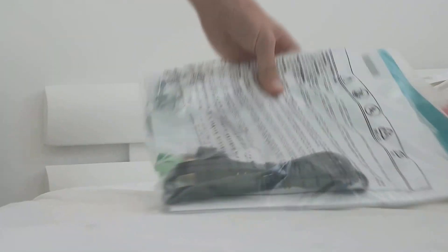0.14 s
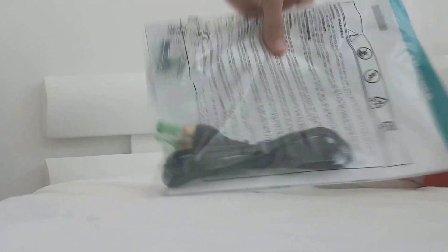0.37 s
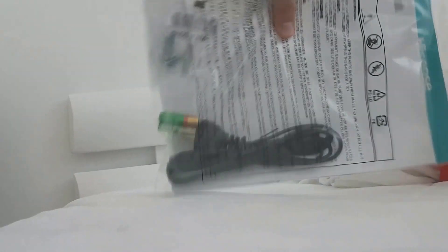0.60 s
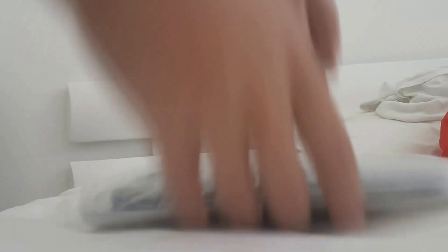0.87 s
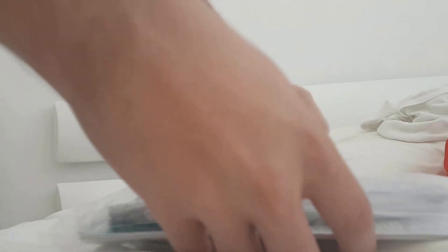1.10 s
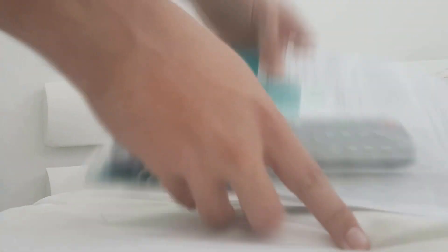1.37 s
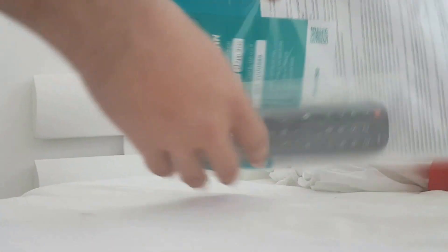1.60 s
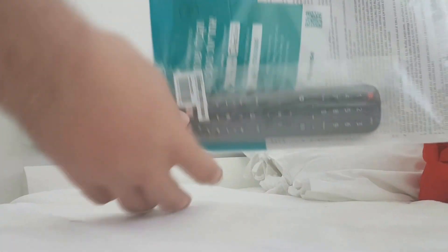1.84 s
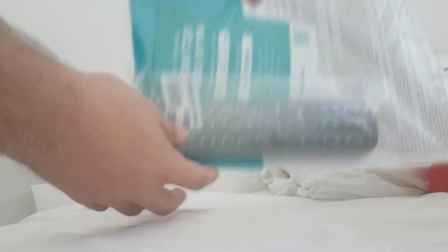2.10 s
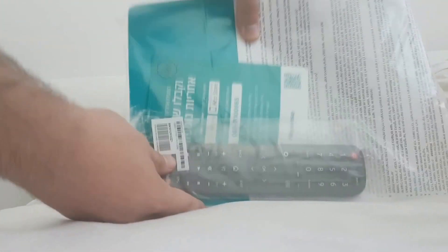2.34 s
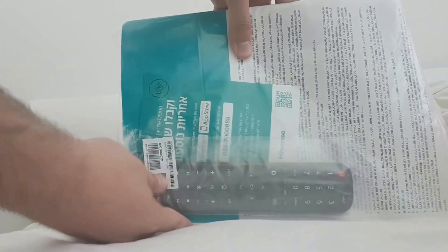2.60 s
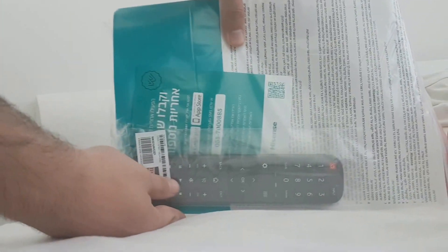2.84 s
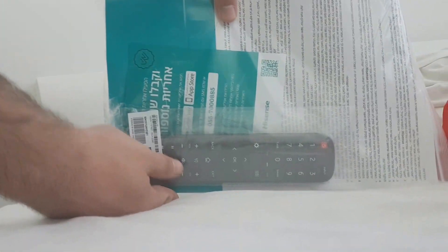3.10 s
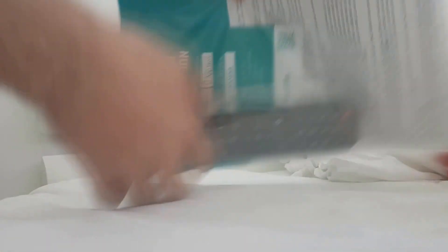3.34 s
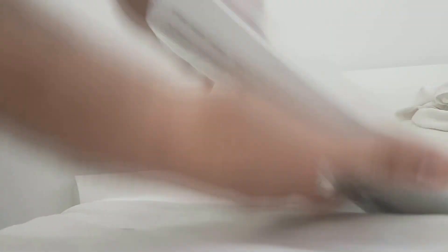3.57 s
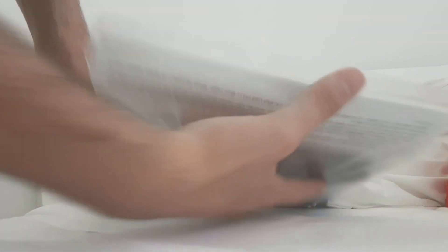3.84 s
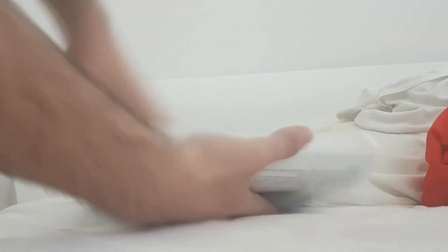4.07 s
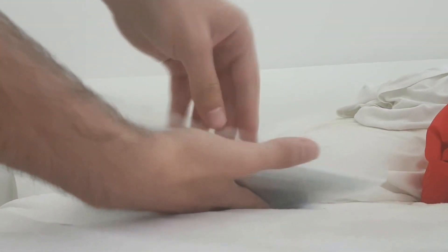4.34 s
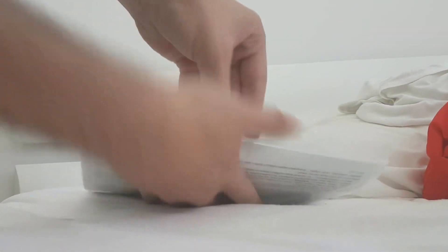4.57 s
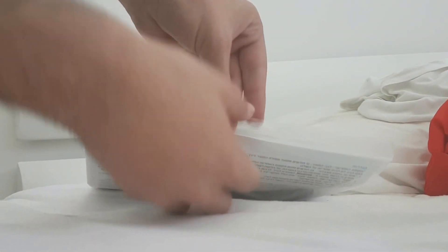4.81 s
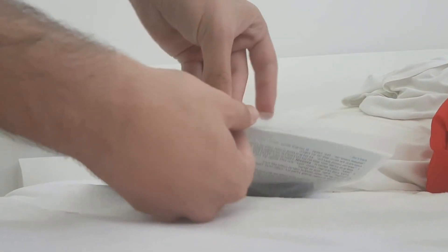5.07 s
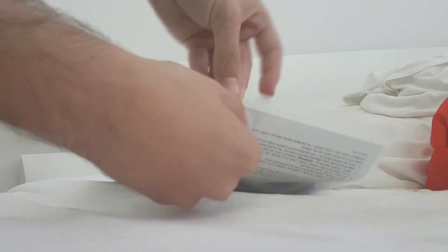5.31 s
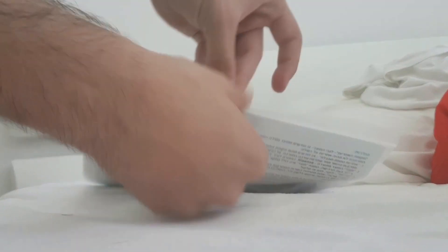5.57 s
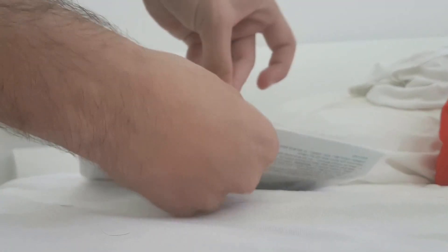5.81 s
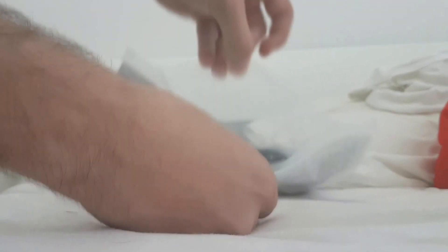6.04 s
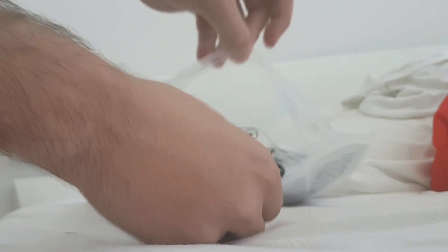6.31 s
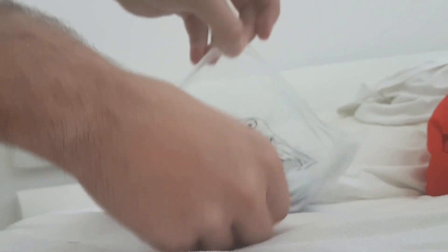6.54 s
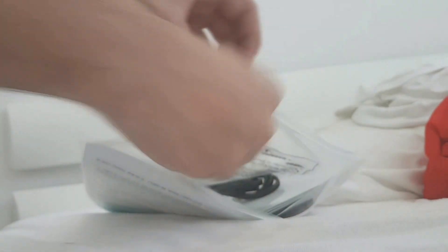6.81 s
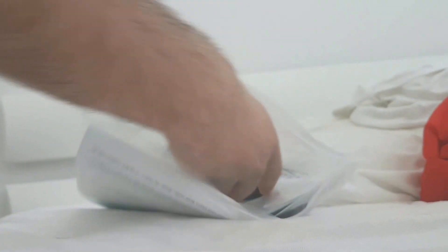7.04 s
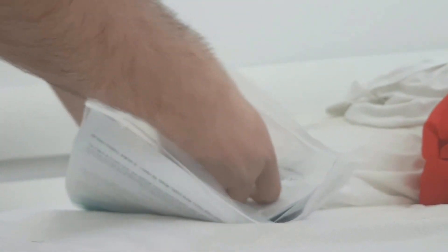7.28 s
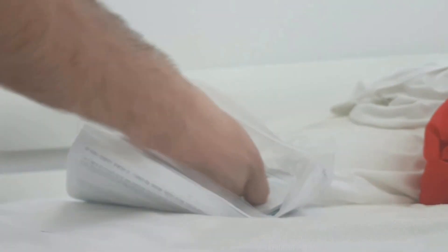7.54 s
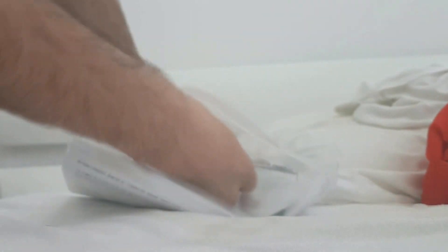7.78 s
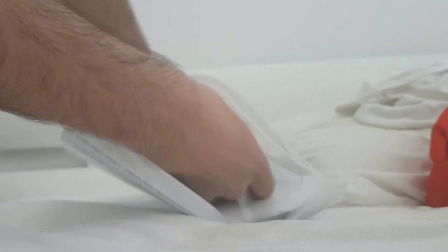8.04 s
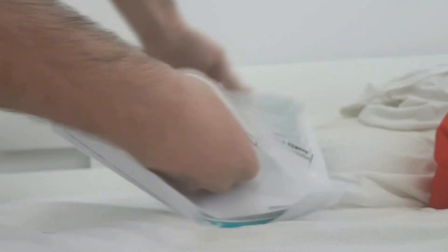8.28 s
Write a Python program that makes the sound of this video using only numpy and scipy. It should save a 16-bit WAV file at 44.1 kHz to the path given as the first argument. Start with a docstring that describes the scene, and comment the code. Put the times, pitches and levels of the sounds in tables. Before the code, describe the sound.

Hands crinkle and turn a thin plastic bag of paper leaflets on a bed, with sharp creasing snaps and soft mattress thumps in a quiet room.

```python
"""Two hands lift, turn and tear open a thin plastic bag of leaflets, a cord and a remote on a bed, near a two-port mic.
It opens on rustling and ringing creases, and from one second heavy parts thump the mattress as low swings.
Just past two seconds comes the loudest snap, a clear, brief ring with hardly any crunch; near 2.6 s a soft sine slides down.
Thumps, bright cracks and a deep wind puff at 3.8 s follow; ticks are sparse from 4.4 s, and after 5.9 s snaps crowd to the end.
Decaying rings make the creases, shaped noise the film, bed and constant hush; a small soft room answers the bag."""
import sys
import numpy as np
from scipy import signal
from scipy.fft import rfft, irfft, next_fast_len
from scipy.io import wavfile
from scipy.ndimage import map_coordinates

SR = 44100
rng = np.random.default_rng(int(sys.argv[2]) if len(sys.argv) > 2 else 0)


def dump(signal):
    """Clip the signal to [-1, 1] and save it as 16-bit WAV at the path in sys.argv[1]."""
    limited = np.clip(np.atleast_2d(signal).T, -1, 1)
    pcm = np.round(limited * 32767).astype(np.int16)
    wavfile.write(sys.argv[1], SR, pcm)


def linear_from_db(decibels):
    """Turn decibels (scalar or array-like) into linear amplitude factors; 0 gives 1."""
    return 10 ** (np.asarray(decibels, float) / 20)


N = 370440

# Large creases flipping over. Each row: start in seconds, before SNAP_DELAY_S, base level in dB, ring pitch in Hz,
# crack relative to the base in dB, ring relative to the base in dB.
CREASE_SNAPS = [(0.062, -30.5, 1810, -30, -7.5), (0.146, -31.5, 1350, -10.5, -6),
                (0.185, -26, 1820, -18, -5), (0.271, -38, 3550, -7.5, 2), (0.341, -42, 1410, -21, -9),
                (0.376, -28.5, 1920, -22, -6.5), (0.447, -25, 2510, -32, -5.5),
                (0.479, -29.5, 890, -14.5, -7.5), (0.646, -38, 2030, -15.5, -5.5),
                (0.683, -33.5, 1370, -17, -6), (0.728, -24.5, 1580, -11, -5), (0.776, -22, 2080, -13, -8),
                (0.888, -23.5, 1680, -12.5, -2), (0.923, -29, 1440, -9, -9.5), (0.973, -34, 1770, -33, -5),
                (1.036, -30.5, 2210, -27.5, -3), (1.081, -32.5, 1780, -23, -6), (1.17, -32, 1890, -19, -4),
                (1.18, -29, 1550, -14, -13), (1.196, -25, 2050, -16.5, -5), (1.288, -34, 1870, -7.5, -5),
                (1.323, -31.5, 1120, -6.5, -11), (1.484, -25, 2560, -13, -5), (1.566, -37, 1400, -28, -6),
                (1.584, -39, 1100, -25, -5), (1.602, -27.5, 1690, -44, -5), (1.63, -33, 1510, -27, -8.5),
                (1.777, -41, 874, -25, -6.5), (1.969, -34.5, 837, -33, -3.5), (1.996, -38.5, 1270, -25, -8),
                (2.163, -12, 2610, -37, 1.5), (2.214, -32.5, 1070, -23, 0.5), (2.291, -33, 1740, -19, -5),
                (2.348, -29.5, 1870, -22, -4), (2.458, -45, 1250, -25, -1), (2.729, -35, 2700, -33, -2),
                (2.834, -37.5, 1880, -22, -4.5), (2.945, -37, 2380, -48, -1.5), (3.221, -42, 686, -1, -2),
                (3.232, -29.5, 1290, -15, -16), (3.352, -23.5, 5500, -17, 0.5), (3.395, -40, 1480, -1, -6),
                (3.435, -34.5, 1560, -5, -2), (3.497, -30.5, 2510, -16, -3.5),
                (3.682, -24, 1850, -16, -5.5), (3.874, -30, 780, -37, -7), (4.032, -33.5, 1750, -27, -7),
                (4.166, -30, 1580, -9, -6.5), (4.344, -34.5, 2120, -9, 3.5), (4.532, -41.5, 780, -31, -7),
                (4.709, -43.5, 786, -27, -5), (4.794, -43.5, 830, -20, -7), (4.827, -24, 1060, -16, -5),
                (5.151, -49, 2250, -16, -5), (5.265, -40, 1240, -19, -4), (5.289, -37, 7600, -9, 1),
                (5.321, -36, 940, -22, -2), (5.335, -23.5, 5250, -8.5, -2), (5.54, -51, 2010, -6, -9),
                (5.628, -40, 1230, -20, -5.5), (5.677, -43.5, 1240, -6.5, -7), (5.78, -51, 1830, -7, -8.5),
                (5.82, -47.5, 1500, -16, -7), (5.943, -39, 1260, -5, -6), (5.951, -32, 1010, 3, -6.5),
                (5.976, -35, 1230, -16, -7), (6.018, -29, 1300, -6.5, -14), (6.159, -40, 900, -17, -8.5),
                (6.177, -32, 740, -7, -5.5), (6.215, -32.5, 890, -18, -7),
                (6.362, -23.5, 3050, -12.5, -3.5), (6.443, -41, 830, -3, -7),
                (6.538, -41.5, 2170, -7.5, -9), (6.638, -36, 870, -10, -7), (6.661, -36, 910, -19, -8),
                (6.768, -35.5, 1530, -15, -8), (6.865, -34.5, 1360, -13.5, -5.5),
                (6.924, -30.5, 1140, -3.5, -7), (6.992, -23.5, 1940, -32, -7),
                (7.196, -29, 2110, -10, -2.5), (7.321, -39.5, 2570, -22, -5),
                (7.384, -36.5, 1130, -12, -15), (7.427, -36.5, 1100, -28, 1), (7.464, -23, 1180, -28, -7),
                (7.477, -24.5, 1160, -18, -1), (7.566, -28, 1190, -33, -4), (7.625, -22.5, 1310, -24, -5),
                (7.731, -22.5, 1120, -28, -4), (7.785, -30.5, 1120, -14, -5.5), (7.913, -39, 920, -23, -7),
                (7.981, -23, 1150, -38, -3.5), (7.999, -25, 1180, -22, -7.5), (8.167, -30, 1680, -17.5, -3),
                (8.206, -21.5, 1680, -32, -5.5), (8.217, -25, 1220, -21, -0.5), (8.324, -28, 2540, -8, -4)]
# Low thumps of weights on the mattress, and at 3.804 s a deep wind puff on the right port.
# Each row: start in seconds, level in dB, pitch in Hz, left over right in dB.
LOW_THUMPS = [(1.049, -41.5, 105, 6), (1.094, -42, 135, -12), (1.477, -38.5, 320, 1.5),
              (2.497, -53, 290, 7), (2.959, -50, 104, 3), (3.23, -37.5, 282, -0.5), (3.561, -35, 134, -6),
              (3.686, -35, 161, 4), (3.804, -39, 57.6, -24), (3.876, -28.5, 200, 2), (4.001, -33.5, 168, 1),
              (4.823, -41, 231, 2.5), (5.334, -40.5, 175, 4), (5.953, -46.5, 152, 1.5),
              (6.926, -39.5, 308, -2), (7.464, -39, 210, 3), (7.558, -33, 338, 3), (7.726, -32.5, 302, 5),
              (7.787, -35.5, 335, 3), (7.983, -35.5, 222, 1)]
# Noise colour of creased paper. Each row: frequency in Hz, relative density in dB.
PAPER_COLOUR = [(120, -32), (200, -27), (262, -7.5), (334, -20), (413, 0), (741, -8.5), (1390, 2),
                (6000, -14.5), (7800, -46), (13200, -120)]
# Noise colour of thin film. Each row: frequency in Hz, relative density in dB.
FILM_COLOUR = [(1500, -12.5), (2500, -3.5), (4300, -7.5), (6000, -8.5), (7600, -5.5), (8900, -18),
               (11500, -15.5), (15600, -17), (16000, -62), (16700, -60), (17000, -90)]
# Noise colour of the pushed mattress. Each row: frequency in Hz, relative density in dB.
MATTRESS_COLOUR = [(15, -49), (28, -42), (54, -1), (97, -1.5), (205, -1), (330, -5), (500, -20), (800, -54)]
# Noise colour of the room and preamp. Each row: frequency in Hz, relative density in dB.
HUSH_COLOUR = [(12, -13), (22, 11.5), (35, -17), (60, -6.5), (110, -23.5), (262, -4.5), (1480, -20),
               (2200, -20.5), (4940, -26.5), (7400, -22.5), (9400, -30), (15600, -22.5), (16000, -47),
               (17000, -100)]
# Likeness of the noise at the two ports. Each row: frequency in Hz, left-right correlation from 0 to 1.
PORT_LIKENESS = [(30, 0.078), (70, 0.48), (140, 0.99), (300, 0.86), (1000, 0.52), (2500, 0.32),
                 (5000, 0.029), (15000, .02)]
# Uneven balance of the two ports. Each row: frequency in Hz, left over right in dB.
PORT_BALANCE = [(25, -1), (60, 2.5), (130, -1)]
# Decay of the room's tail. Each row: frequency in Hz, time to fall by 60 dB in seconds.
ROOM_DECAY = [(200, 0.29), (1000, 0.25), (3000, 0.34), (8000, 0.25), (15000, 0.091)]
# First echoes. Each row: delay in seconds, level relative to the bag in dB.
FIRST_ECHOES = [(.003, -43.5), (0.0095, -18.5), (0.013, -31), (0.0202, -16.5)]
# Falling tone of a slackening panel. Each row: time in seconds, pitch in Hz, level in dB.
SLACKENING_PANEL = [(2.555, 325, -70), (2.57, 310, -59), (2.615, 211, -55), (2.65, 160, -73)]
# Grips, tugs and squeezes. Each row: peak time in seconds, relative creasing level in dB,
# rise in seconds and fall in seconds (each the time for SWING_DB of paper level), film relative to creasing in dB.
HAND_GRIPS = [(.08, -55.5, 0.033, 0.37, -11), (.188, -52, .4, 0.27, -3.5), (.46, -48, 0.6, 0.18, -7.5),
              (0.734, -38.5, 0.078, 0.051, -8.5), (.786, -35, 0.051, 0.063, -7.5),
              (.844, -33.5, 0.07, 0.21, -7), (1.186, -41.5, .15, 0.45, -17),
              (1.422, -40.5, .45, 0.39, -8.5), (1.66, -54, 0.8, 0.3, -6.5), (2.012, -51.5, 0.095, 0.39, -9),
              (2.171, -49.5, 0.016, 1, -6), (2.546, -62, 0.56, 0.092, -1), (2.832, -62, 0.11, 0.11, -5),
              (2.99, -55, 0.1, 0.069, -11), (3.247, -44, 0.038, 0.12, -7.5), (3.362, -53, .03, 0.37, -12),
              (3.56, -41, 0.082, 0.26, -5), (3.697, -42, 0.13, 0.37, -6.5), (4.047, -44.5, 0.82, .4, -9.5),
              (4.201, -50.5, 0.1, 0.088, 2), (4.355, -55.5, 0.07, 0.24, -4),
              (4.544, -58.5, 0.087, .2, -9.5), (4.699, -57.5, .15, 0.52, -12),
              (4.837, -60, 0.049, .075, -2.5), (5.172, -59.5, 0.41, 0.13, -9), (5.272, -54, .015, .2, -9),
              (5.341, -45.5, 0.098, .1, -6.5), (5.555, -60, 0.071, 0.11, -8),
              (5.671, -51.5, 0.084, .093, -9.5), (5.956, -39.5, .008, 0.26, -5),
              (6.03, -51.5, 0.14, 0.087, -7), (6.212, -48.5, 0.15, 0.25, -12),
              (6.376, -53.5, 0.032, 0.48, -9), (6.655, -48, 0.099, 0.18, -13),
              (6.783, -75, 0.057, 0.13, -6), (6.924, -44, 0.095, 0.26, -5.5),
              (7.052, -41, 0.242, 0.29, -7.5), (7.476, -40, 0.11, 0.23, -12),
              (7.634, -50.5, 0.053, .27, -10), (7.732, -44, 0.035, 0.32, -11),
              (7.995, -41, 0.16, 0.16, -10), (8.215, -44.5, 0.27, 0.64, -10)]
# The bag on the bed. Each row: time in seconds, relative weight on the mattress in dB, left over right in dB.
BAG_ON_BED = [(0, -53.5, 2), (.6, -69.5, 0.5), (1.06, -49.5, 3), (1.4, -57.5, 2.5), (1.9, -75, 1),
              (2.5, -54.5, 3.5), (3.1, -52.5, 1.5), (3.3, -53, 2.5), (3.8, -47, 2.5), (4.4, -63, 3),
              (4.9, -64, 3.5), (5.9, -81, 2), (6.3, -58, 1.5), (6.9, -50.5, 4), (7.4, -50, 2.5),
              (8.4, -52.5, 3.5)]

SWING_DB, FILM_STEEPER = 20, 1.53  # the film's dB slopes are this many times the paper's
BED_FOLLOWS, FIRM_DB = 0.47, -49.5  # share of the hands' dB swings the bed feels, around a firm grip in dB
SNAP_DELAY_S = 0.001247  # short delay added to every snap start, seconds


def unit(x):
    """Scales to rms 1."""
    return x / np.sqrt(np.mean(x ** 2) + 1e-20)


def along(points, hz):
    """Reads a curve of frequency and value on a log frequency axis."""
    f, v = np.transpose(points)
    return np.interp(np.log(hz + 1), np.log(f + 1), v)


def curves(rows):
    """Draws one value per sample for each column after the time."""
    s, *columns = np.transpose(rows)
    return [np.interp(np.arange(N) / SR, s, column) for column in columns]


def wobble(rate):
    """Draws a smooth random curve with rate knots a second."""
    knots = rng.standard_normal(int(N * rate / SR) + 4)
    return map_coordinates(knots, [np.arange(N) * rate / SR])


def filtered(x, response):
    """Shapes x by a gain that depends on frequency."""
    m = next_fast_len(N + 8192)
    return irfft(rfft(x, m) * response(np.fft.rfftfreq(m, 1 / SR)), m)[..., :N]


def sides(lean_db):
    """Splits a left-over-right lean into two gains."""
    return linear_from_db(np.multiply.outer([.5, -.5], lean_db))


def rush(colour):
    """Stereo noise of overall rms 1: shared mid and opposed side set the likeness of the ports at each frequency."""
    def mid_side_gains(hz):
        angle = np.arccos(np.clip(along(PORT_LIKENESS, hz), 0, 1)) / 2
        return linear_from_db(along(colour, hz)) * [np.cos(angle), np.sin(angle)]

    mid, side = filtered(rng.standard_normal((2, N)), mid_side_gains)
    return unit(np.array([mid + side, mid - side]))


def rings(s, db, hz, lean_db, cycles, lag_s, size):
    """Sines that swell for half of cycles and then die; a positive lag_s makes the left port hear them later."""
    early = 8  # samples of room for the port that hears first
    out = np.zeros((2, N + size))
    at = np.clip(np.round(s * SR).astype(int), 0, N - 1)[:, None] + np.arange(size)
    for ch, (gain, way) in enumerate(zip(sides(lean_db), (.5, -.5))):
        since_s = np.arange(-early, size - early) / SR - way * lag_s[:, None]
        turns = np.maximum(since_s, 0) * hz[:, None]
        u = 2 * turns / cycles
        swell = (u * np.exp(1 - u)) ** 2
        wave = (linear_from_db(db) * gain)[:, None] * swell * np.sin(2 * np.pi * turns)
        out[ch] = np.bincount(at.ravel(), wave.ravel(), N + size)
    return out[:, early:N + early]


def bursts(s, db, life_s):
    """Envelope of sudden bursts that fall exponentially with time constant life_s."""
    t = np.arange(SR // 20)
    at = np.clip(np.round(s * SR).astype(int), 0, N - 1)[:, None] + t
    shape = linear_from_db(db)[:, None] * np.exp(-t / SR / life_s)
    return np.bincount(at.ravel(), shape.ravel(), N + len(t))[:N]


def hush():
    """Steady coloured noise of the room and preamp."""
    return linear_from_db(-67.5) * rush(HUSH_COLOUR)


def room(x):
    """A few early echoes, then a noise tail with its own decay at each frequency; each port hears its own."""
    hz, t, z = signal.stft(rng.standard_normal((2, SR // 2)), SR, nperseg=256)
    fading = z * linear_from_db(-60 * t / along(ROOM_DECAY, hz)[:, None])
    tail = signal.istft(fading, SR, nperseg=256)[1]
    tail = linear_from_db(-11) * tail / np.linalg.norm(tail[0])
    answer = np.pad(tail, ((0, 0), (round(.011 * SR), 0)))  # the tail starts after 11 ms
    for s, db in FIRST_ECHOES:
        answer[[0, 1], round(s * SR) + rng.integers(0, 12, 2)] += linear_from_db(db)
    return signal.fftconvolve(x, answer, axes=1)[:, :N]


def mattress_and_puff(level_db):
    """Soft pushes rumble through the bed as low noise; each thump, and the one wind puff, is a single low swing."""
    s, db, hz, lean_db = np.transpose(LOW_THUMPS)
    lag_s = rng.normal(0, 1e-4, len(s))
    swings = rings(s, db, hz, lean_db, cycles=1.34, lag_s=lag_s, size=4000)
    rumble_db = level_db + 2.7 * wobble(13) - 6.5
    return swings + linear_from_db(rumble_db) * rush(MATTRESS_COLOUR)


def glide():
    """One soft falling sine from a panel that bends and slackens."""
    hz, db = curves(SLACKENING_PANEL)
    t = np.arange(N) / SR
    sounding = (t > SLACKENING_PANEL[0][0]) * (t < SLACKENING_PANEL[-1][0])
    return linear_from_db(db) * sounding * np.sin(2 * np.pi * np.cumsum(hz) / SR)


def hands():
    """Paper and film levels in dB: every grip swells to its peak and dies away; their powers add."""
    t = np.arange(0, N + 64, 64) / SR
    paper, film = 1e-10, 1e-10
    for s, db, rise_s, fall_s, film_db in HAND_GRIPS:
        below_db = SWING_DB * np.maximum((s - t) / rise_s, (t - s) / fall_s)
        paper = paper + linear_from_db(db - below_db) ** 2
        film = film + linear_from_db(db + film_db - FILM_STEEPER * below_db) ** 2
    return [np.interp(np.arange(N) / SR, t, 10 * np.log10(power)) for power in (paper, film)]


def crackle(level_db, clumps, count=1500):
    """Thin film ticks: millisecond bursts of bright noise on a hiss."""
    tick_db = np.minimum(3.2 * rng.exponential(size=count), 18)
    ticks = unit(bursts(rng.random(count) * N / SR, tick_db, life_s=0.0011))
    return linear_from_db(level_db + 2.0 * clumps - 0.5) * (1.074 + 0.65 * ticks) * rush(FILM_COLOUR)


def creasing(level_db, lean_db, clumps, count=9000):
    """Small panels buckle over a rubbing noise: separate ticks under a light touch, a dense crumple under a firm one."""
    when, chance = rng.random((2, count))
    pitch, size = rng.standard_normal(count), rng.exponential(size=count)
    lean, lag = rng.standard_normal((2, count))
    # share of the panels that give way
    busy = np.clip(linear_from_db(1.1 * (level_db[(when * N).astype(int)] + 41.5)), .04, 1)
    size_db = np.minimum(4.64 * size, 15) + 1.5 * pitch  # wide, low panels move more gently
    # fewer ticks carry the same energy
    size_db = np.where(chance < busy, size_db - 10 * np.log10(busy), -120)
    hz = np.clip(1100 * np.exp(.65 * pitch), 250, 7000)
    pops = rings(when * N / SR, size_db, hz, 1.4 * lean, cycles=1.24, lag_s=9e-5 * lag, size=300)
    crumple = unit(unit(pops) + 0.79 * rush(PAPER_COLOUR))
    return linear_from_db(level_db + 3.3 * clumps - 4.0) * sides(lean_db) * crumple


def chance_snaps(level_db, count=90):
    """Columns like CREASE_SNAPS at chance moments, as strong as the grip allows."""
    when, luck = rng.random(count), rng.standard_normal((4, count))
    base_db = level_db[(when * N).astype(int)] + 11 + 2.5 * luck[0]
    hz = 1670 * np.exp(0.36 * luck[1])
    crack_db = -16 + 5.5 * luck[2]
    ring_db = np.minimum(-6 + 0.5 * luck[3], 0)
    return [when * N / SR, base_db, hz, crack_db, ring_db]


def snaps(level_db, lean_db):
    """Larger creases flip over: a brief ring (the louder port hears it first), a dry crunch and a bright crack."""
    rows = np.hstack([np.transpose(CREASE_SNAPS), chance_snaps(level_db)])
    s, db, hz, crack_db, ring_db = rows
    s = s + SNAP_DELAY_S
    side_db = 1.22 * rng.standard_normal(len(s))
    ring = rings(s - .0003, db + ring_db, hz, side_db, cycles=2.2, lag_s=-3e-5 * side_db, size=500)
    crunch_db = db + np.minimum(-2.6 * ring_db - 26, -3.5)  # the less it rings, the more it crunches
    crunch = bursts(s, crunch_db, life_s=0.0042) * rush(PAPER_COLOUR)
    crack = bursts(s, db + crack_db + 4.0, life_s=0.0012)
    crack = crack + bursts(s, db + crack_db - 7.5, life_s=0.0045)  # softer, longer end
    return sides(lean_db) * (ring + crunch) + crack * rush(FILM_COLOUR)


def scene():
    """The hush, the bed and wind puff, the sliding tone, and the bag with the room's answer."""
    paper_db, film_db = hands()
    weight_db, lean_db = curves(BAG_ON_BED)
    clumps = wobble(40)
    low = mattress_and_puff(weight_db + BED_FOLLOWS * (paper_db - FIRM_DB))
    bag = crackle(film_db, clumps) + creasing(paper_db, lean_db, clumps) + snaps(paper_db, lean_db)
    return hush() + low + glide() + bag + room(bag)


def top_cut(x):
    """Nothing passes above the cut-off."""
    return signal.sosfilt(signal.butter(12, 16820, fs=SR, output="sos"), x)


def record(dry):
    """Two microphone ports with an uneven balance, most marked in the bass."""
    mix = filtered(dry, lambda hz: sides(along(PORT_BALANCE, hz)))
    return top_cut(mix)


dry = scene()
out = record(dry)
dump(out)
```